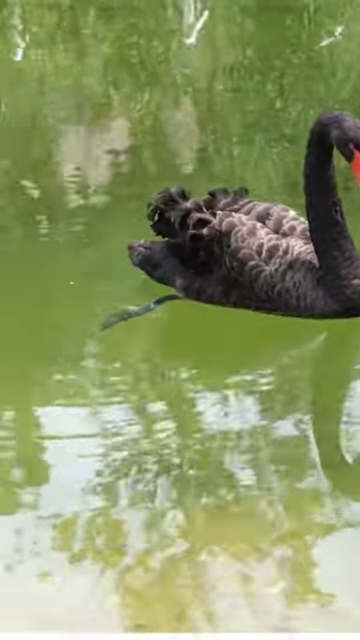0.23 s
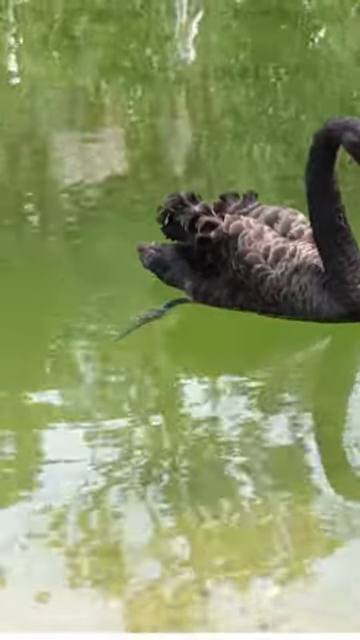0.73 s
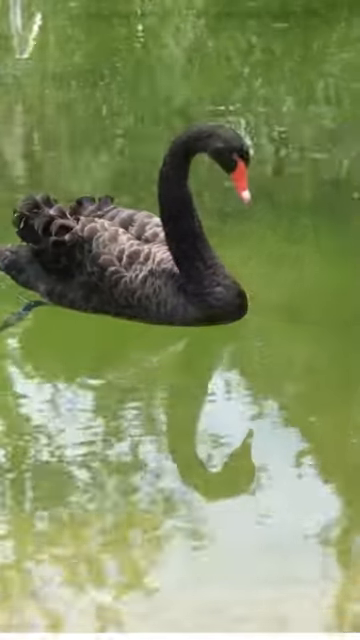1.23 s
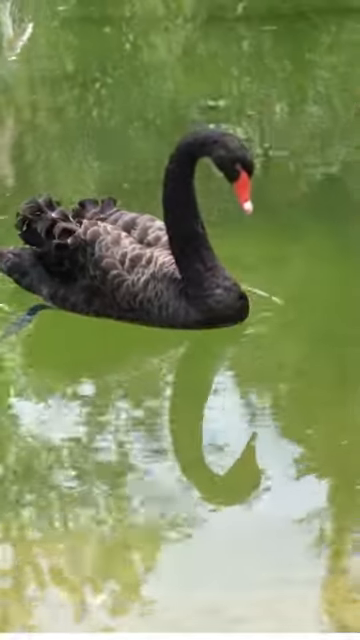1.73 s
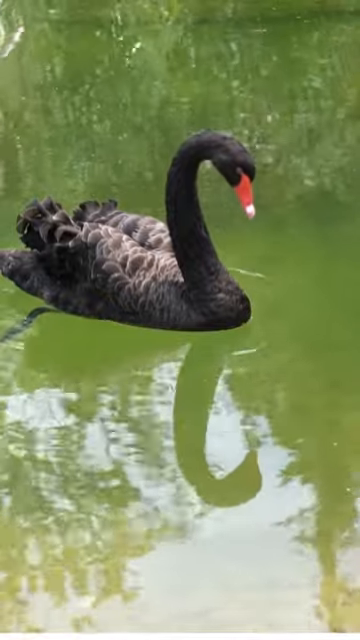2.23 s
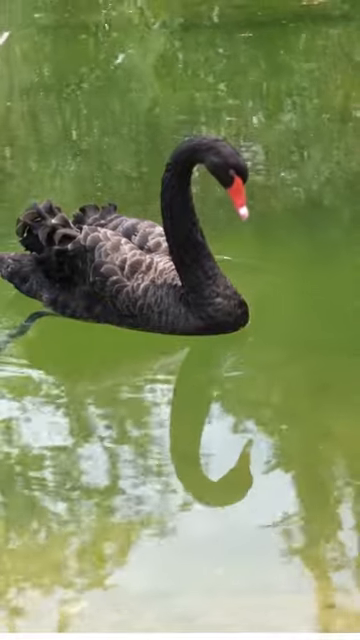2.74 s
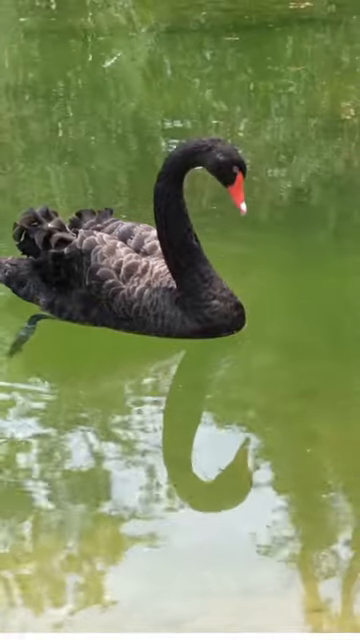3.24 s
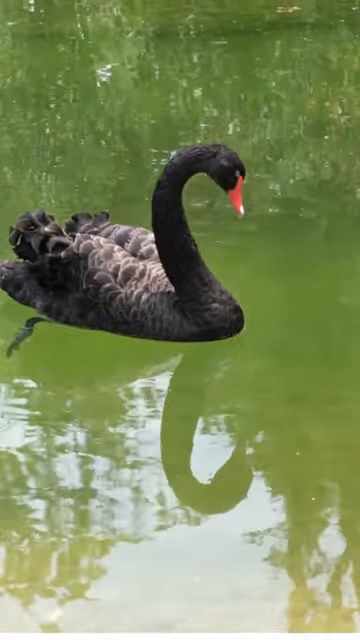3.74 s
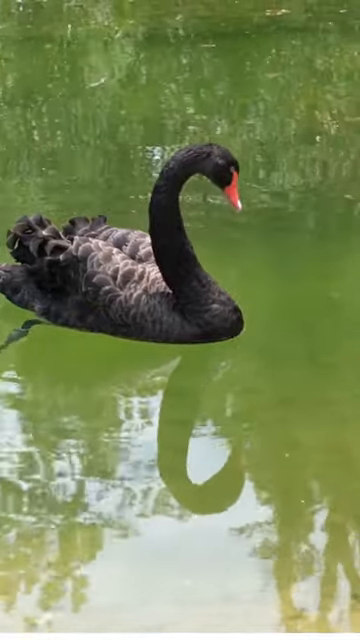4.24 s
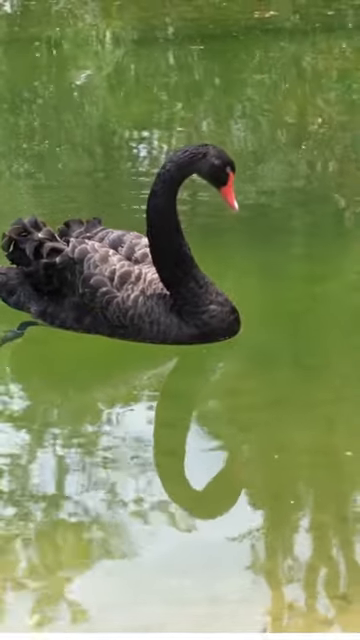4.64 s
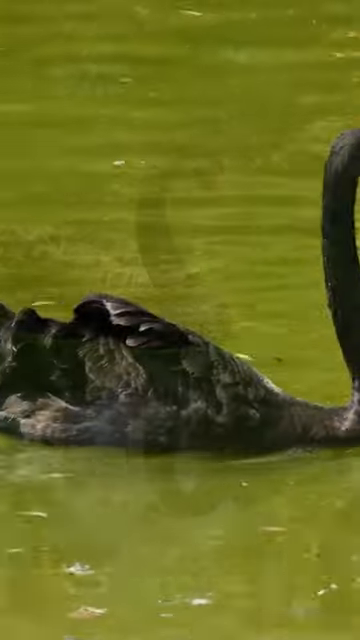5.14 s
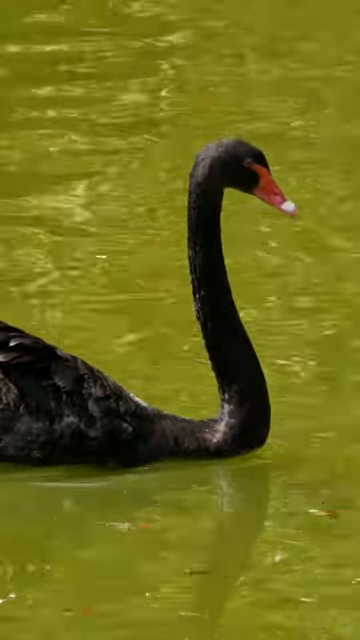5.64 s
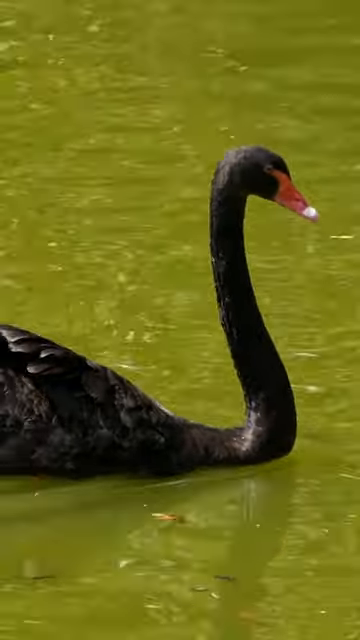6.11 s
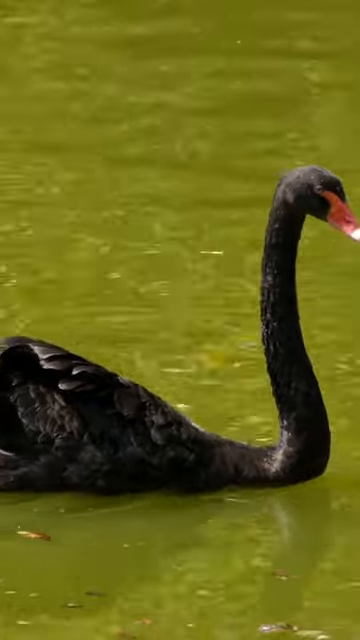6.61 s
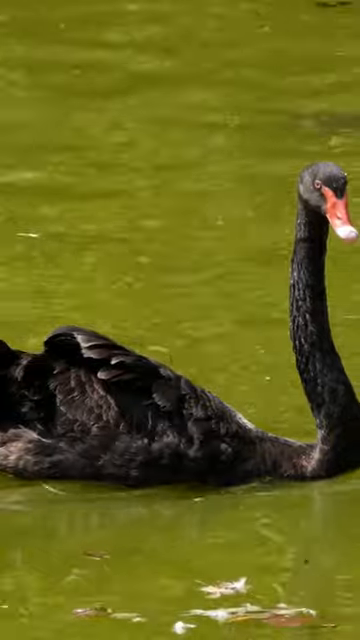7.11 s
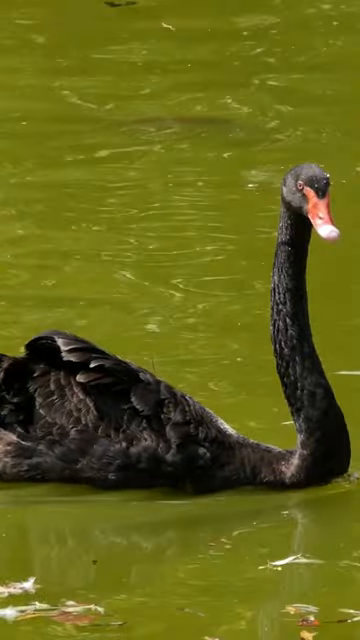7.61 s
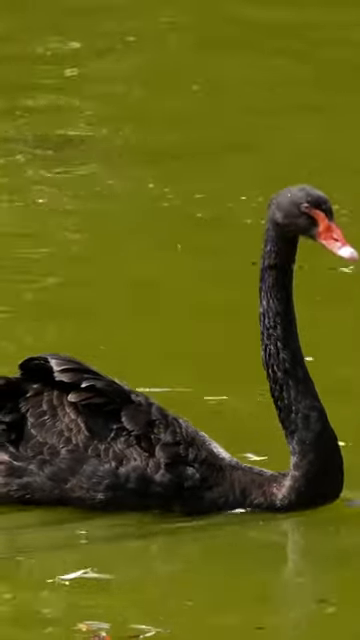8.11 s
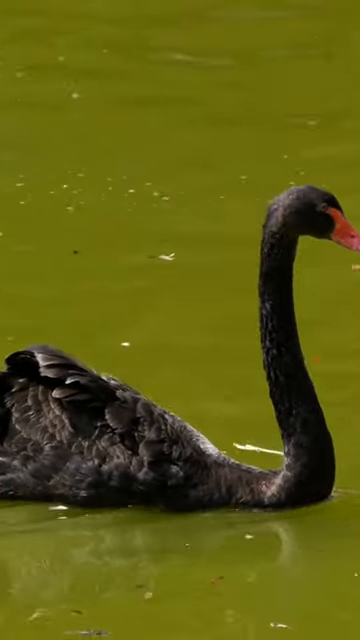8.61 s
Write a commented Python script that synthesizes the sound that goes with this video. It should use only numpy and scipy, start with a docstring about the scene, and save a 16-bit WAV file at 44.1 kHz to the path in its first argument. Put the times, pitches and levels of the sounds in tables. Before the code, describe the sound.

Three short, reedy swan bugles ring out close by over calm water, with two muffled grunts before the last and tiny drips around.

```python
"""A black swan bugles three times on a quiet lake, with two soft grunts between the second and third.
Each bugle is a stack of partials: a fast flutter that overloads the microphone chops it, then it clears
into a falling whistle and breaks to a short lower note. The grunts are softer flutters in a shut bill.
Small drips (splash and ringing bubble), grainy swishes, a soft low bump and two faint gliding bird calls
lie over a wash of shaped noise; a noise tail carries the swan's echo from the banks."""
import sys
import numpy as np
from scipy import signal
from scipy.fft import rfft, irfft
from scipy.io import wavfile
from scipy.ndimage import uniform_filter1d

SR = 44100
rng = np.random.default_rng(int(sys.argv[2]) if len(sys.argv) > 2 else 0)


def master_out(mix):
    """Clip the mix to full scale and print it as 16-bit PCM to the path in sys.argv[1]."""
    frames = np.transpose(np.atleast_2d(mix))
    ceiling = np.clip(frames, -1, 1)
    pcm = np.round(ceiling * 32767).astype(np.int16)
    wavfile.write(sys.argv[1], SR, pcm)


N = 390726  # length in samples

# pitch of a bugle: a settled whistle, a yelp at the onset, and a sag before the break
WHISTLE_HZ, YELP_HZ, YELP_S, SAG_HZ, SAG_S = 1162.9, 104, 0.012, 126, 0.12
# the whistle settles slowly; the pitch droops early in the flutter
SETTLE_HZ_PER_S, DROOP_HZ, DROOP_AT_S, DROOP_WIDTH_S = 58, 43, 0.021, 0.012
# roughness (0-1) sets in just after the tone, swells early in the flutter and clears quickly
ROUGH_ENDS, ROUGH_TOP, ROUGH_PEAK_S, ROUGH_WIDTH_S = 0.64, 0.93, 0.035, 0.022
FLUTTER_IN_S, CLEAR_S = 0.017, 0.008
# loudness: the fundamental speaks first and stops last
PREROLL_S, ATTACK_S, ATTACK_DB = 0.012, 0.02, 40.5
RELEASE_S, RELEASE_DB, FUNDAMENTAL_SHARE = 0.036, 62.5, 0.12
# the whistle dips once, swells again by a share of the dip, and fades slowly
DIP_AT_S, DIP_WIDTH_S, FADE_DB_PER_S = 0.143, 0.018, 16.5
SWELL_AT_S, SWELL_WIDTH_S, SWELL_SHARE = 0.21, 0.031, 0.45
EASE_S, SHIMMER_DB = 0.022, 1.26  # easing out of the flutter; independent shimmer of each partial
# closing note: pitch at the break and its fall, time to its peak, length, drop at the start and the end
CLOSING_HZ, CLOSING_FALL_HZ, CLOSING_PEAK_S, CLOSING_S = 951.7, 99, 0.031, 0.087
CLOSING_IN_DB, CLOSING_OUT_DB = 13.5, 34
# grunts: time to the peak, length, and the extra pitch at the start with its decay time
GRUNT_PEAK_S, GRUNT_S, GRUNT_DROP_HZ, GRUNT_DROP_S = 0.04, 0.17, 194, 0.033


def gain_of(db):
    """Decibels to amplitude."""
    return 10 ** (np.asarray(db) / 20)


def evened(x):
    """Scales to rms 1."""
    return x / np.sqrt(np.mean(x ** 2) + 1e-20)


def read(points, hz):
    """Reads a curve over frequency on a log-frequency axis."""
    f, value = np.transpose(points)
    return np.interp(np.log(hz + 1), np.log(f + 1), value)


def add(mix, s, sound):
    """Mixes a sound in at time s."""
    part = mix[max(round(s * SR), 0):][:len(sound)]
    part += sound[:len(part)]


def wander(t, hz):
    """Smooth random curve, cut from one second of low-passed noise of rms 1."""
    f = np.fft.rfftfreq(SR, 1 / SR)
    spectrum = rfft(rng.standard_normal(SR)) * np.exp(-(f / hz) ** 2)
    return evened(irfft(spectrum, SR))[:len(t)]


def bandpassed(x, low_hz, high_hz):
    """Keeps one band of a sound."""
    return signal.sosfilt(signal.butter(2, [low_hz, high_hz], "band", fs=SR, output="sos"), x)


def angle_of(hz):
    """Running phase of a frequency curve."""
    return 2 * np.pi * np.cumsum(hz) / SR


def faded(x, size=350):
    """Softens both ends of a sound over size samples."""
    edge = np.arange(len(x))
    return x * np.sin(np.pi / 2 * np.minimum(np.minimum(edge, edge[::-1]) / size, 1)) ** 2


def hump(x, centre, width):
    """A bell of height 1."""
    return np.exp(-((x - centre) / width) ** 2)


def swell(u, sharpness):
    """Level in dB of a quick rise and a slower fall, 0 dB at u = 1."""
    return sharpness * 20 * np.log10(u * np.exp(1 - u) + 1e-9)


def pushed(age, flutter_s, ease_s):
    """1 while the bird pushes hard, easing to 0 as the flutter ends."""
    return (1 - np.tanh((age - flutter_s) / (2 * ease_s))) / 2


def bugle(flutter_s, break_s, lift_hz, flare_db, dip_db, flutter_tone, whistle_tone,
          glide_s=0.0081, relax_s=0.006, late_db=30):
    """The gesture of every bugle: time, pitch, roughness and the levels of its five main partials."""
    # Peaks and notches of the open throat, which the falling partials slide through.
    # Each row: centre in Hz, width in Hz, gain in dB.
    throat = [(2200, 150, -5), (3290, 140, 1), (4650, 90, 1), (4560, 45, -12), (4740, 50, -9),
              (5603, 100, 14.5)]
    # Partials that flare as the flutter clears.
    # Each row: partial number, time from the flutter's end in seconds, width in seconds.
    flares = [(3, -0.0094, .012), (2, 0.018, 0.012)]
    # Share of the whistle's dip taken by partials 1 to 5 [ratio].
    dip_shares = (1, 0.35, 0.82, .05, 0.41)
    age = np.arange(-PREROLL_S, break_s, 1 / SR)
    to_break = age - break_s

    hz = WHISTLE_HZ + lift_hz * pushed(age, flutter_s, glide_s)
    hz += YELP_HZ * hump(np.maximum(age, 0), 0, YELP_S)
    hz -= SETTLE_HZ_PER_S * (age - DIP_AT_S)
    hz -= SAG_HZ * np.maximum(1 + to_break / SAG_S, 0) ** 2
    hz -= DROOP_HZ * hump(age, DROOP_AT_S, DROOP_WIDTH_S)

    rough = ROUGH_ENDS + (ROUGH_TOP - ROUGH_ENDS) * hump(age, ROUGH_PEAK_S, ROUGH_WIDTH_S)
    rough *= np.minimum(np.maximum(age + PREROLL_S / 2, 0) / FLUTTER_IN_S, 1)
    rough = np.clip(rough * pushed(age, flutter_s, CLEAR_S), 0, 1)

    effort = pushed(age, flutter_s - relax_s, EASE_S)
    starting = np.maximum(1 - (age + PREROLL_S) / ATTACK_S, 0)
    release_db = RELEASE_DB * np.maximum(1 + to_break / RELEASE_S, 0) ** 2
    dip = hump(age, DIP_AT_S, DIP_WIDTH_S) - SWELL_SHARE * hump(age, SWELL_AT_S, SWELL_WIDTH_S)
    fade_db = FADE_DB_PER_S * (age - DIP_AT_S)
    levels_db = []
    for k, (rough_db, clear_db, dip_share) in enumerate(zip(flutter_tone, whistle_tone, dip_shares), 1):
        whistle_db = clear_db - dip_share * dip_db * dip - fade_db
        whistle_db += sum(peak_db * hump(k * hz, centre, width) for centre, width, peak_db in throat)
        db = effort * rough_db + (1 - effort) * whistle_db + SHIMMER_DB * wander(age, 25)
        for partial, delay, width in flares:
            if round(partial) == k:
                db += flare_db * hump(age, flutter_s + delay, width)
        db -= starting * (ATTACK_DB + late_db * np.log(k))  # upper partials speak later
        db -= release_db * (1 if k > 1 else FUNDAMENTAL_SHARE)
        levels_db.append(db)
    return age, hz, rough, levels_db


def flutter(t, rough, calm_hz=132, slowing_hz=28, lead=0.1):
    """The beat of the syrinx: how far it is open, and where it is in its swing."""
    # deeper flutter is slower
    beat = lead + angle_of((calm_hz - slowing_hz * rough) * (1 + 0.059 * wander(t, 80)))
    # at full push each beat splits unevenly in two
    chaos = np.clip((rough - 0.68) / 0.3, 0, 0.85)
    flap = (1 - chaos) * np.cos(beat) + chaos * np.cos(2 * beat + 0.6 * wander(t, 130))
    opening = np.maximum(1 + np.minimum(1.45 * rough, 1) * flap, 0)
    return opening, (np.cos(beat - 0.3) + flap) / 2


def windpipe(partial, rough, trip_s=0.0013, reflection=0.064):
    """The swinging partial meets its own reflection in the long windpipe, then is evened to rms 1."""
    at = np.arange(len(partial))
    partial = partial + reflection * rough * np.interp(at - trip_s * SR, at, partial)
    return partial / np.sqrt(uniform_filter1d(partial ** 2, size=700) + 1e-9)


def call(start, t, hz, rough, main_db, dulling_db_per_s=100, puff_db=-36, swing_hz=90, jitter_hz=40,
         spread=0.45, scatter=0.45, skew=0.59, push_db=-1.5, blare_db=18, rasp_db=-31):
    """The syrinx sings a stack of partials; when pushed it flutters, chopping the tone and swinging its pitch."""
    # Colour of the overtones above the fifth, relative to a brightness set by the third.
    # Each row: frequency in Hz, level in dB.
    treble = [(6200, -53.5), (6900, -52.5), (7900, -38.5), (8400, -48.5), (9500, -64.5)]
    opening, swing = flutter(t, rough, lead=4.2)
    crest_hz = hz + swing_hz * rough
    jitter = jitter_hz * rough ** 2 * wander(t, 300) + 0.31 * wander(t, 40)
    phase = angle_of(hz + swing_hz * rough * swing + jitter)
    # effort brings out the top overtones, and the clear whistle dulls with time
    bright_db = main_db[2] + 0.7 * (main_db[2] + 26.0) + blare_db * rough
    bright_db = bright_db - dulling_db_per_s * (t - DIP_AT_S) * (1 - rough)
    levels_db = main_db + [bright_db + read(treble, k * crest_hz) for k in range(6, 9)]
    voice = np.zeros(len(t))
    for k, db in enumerate(levels_db, 1):
        # high partials sound nearer the crest of each beat, and drift out of step
        chop = opening ** (0.3 + 0.14 * k) * gain_of(2 * rough ** 2 * wander(t, 200))
        drift = 0.19 * k * rough ** 2 * wander(t, 220)
        offset = (spread + scatter * rough) * k ** 2 + skew + drift
        voice += gain_of(db) * windpipe(chop * np.cos(k * phase + offset), rough)
    rasp = gain_of(rasp_db) * rough * abs(voice) * rng.standard_normal(len(t))
    air = evened(bandpassed(rng.standard_normal(len(t)), 300, 560))
    loudness = np.sqrt(uniform_filter1d(voice ** 2, size=200) + 1e-12)
    puffs = gain_of(puff_db) * rough ** 2 * loudness * air
    return start + t[0], gain_of(push_db * rough) * faded(voice + rasp + puffs)


def closing(start, level_db, tilt_db, overlap_s=0.0045, brightening=0.2, spread=0.93):
    """The voice breaks to a clean lower note, a stack of partials which dulls as it fades."""
    # Colour of the note before its tilt. Each row: partial number, level in dB.
    closing_tone = [(1, 5), (2, -1.5), (3, -6), (4, 5), (5, -5), (6, -6), (7, -44.5)]
    t = np.arange(0, CLOSING_S, 1 / SR)
    hz = CLOSING_HZ - CLOSING_FALL_HZ * (t / CLOSING_S) ** 1.68
    rising = np.maximum(1 - t / CLOSING_PEAK_S, 0)
    falling = np.maximum(t - CLOSING_PEAK_S, 0) / (CLOSING_S - CLOSING_PEAK_S)
    db = level_db - CLOSING_IN_DB * rising ** 2 - CLOSING_OUT_DB * falling ** 2.62
    phase = angle_of(hz + 1.1 * wander(t, 90))
    slope_db = tilt_db + brightening * (db - db.max())
    sizes = [gain_of(tone_db + (k - 1) * slope_db) for k, tone_db in closing_tone]
    voice = sum(size * np.cos(k * phase + spread * k ** 2) for k, size in enumerate(sizes, 1))
    voice = voice * np.sqrt(2 / np.sum(np.square(sizes), 0))  # rms 1 whatever the colour
    return start - overlap_s, faded(gain_of(db) * voice)


def grunt(start, flutter_s, pitch_hz, level_db, roughness, sharpness, fading=0.1, swing_hz=170,
          jitter_hz=50, tilt_db=-2, dulling=0.022, air=0.06, leak_db=-25):
    """The same flutter, softly, through the fixed resonances of a shut bill; duller as it falls and fades."""
    # Resonances of the shut bill. Each row: centre in Hz, width of each of two passes in Hz, gain in dB.
    shut_throat = [(1170, 910, 3.5), (2910, 440, -7.5), (4196, 360, 11)]
    t = np.arange(0, GRUNT_S, 1 / SR)
    hz = pitch_hz + GRUNT_DROP_HZ * np.exp(-t / GRUNT_DROP_S)
    db = level_db + swell(t / GRUNT_PEAK_S, sharpness)
    rough = np.clip(roughness * pushed(t, flutter_s, EASE_S), 0, 1)
    opening, swing = flutter(t, rough, lead=2.73)
    phase = angle_of(hz + rough * (swing_hz * (swing - 0.5) + jitter_hz * wander(t, 450)))
    slope_db = tilt_db + dulling * (hz - 1402) + fading * np.maximum(db - level_db, -20)
    sizes = [gain_of(slope_db * k) for k in range(5)]
    source = sum(size * np.cos(k * phase) for k, size in enumerate(sizes, 1))
    source = source / np.sqrt(np.sum(np.square(sizes), 0))
    source = opening ** 0.63 * (source + air * rough * rng.standard_normal(len(t)))
    voice = gain_of(leak_db) * source
    for centre, width, peak_db in shut_throat:
        b, a = signal.iirpeak(centre, centre / width, fs=SR)
        voice += gain_of(peak_db) * signal.lfilter(b, a, signal.lfilter(b, a, source))
    loudness = np.sqrt(abs(uniform_filter1d(voice ** 2, size=800)) + 1e-12)
    return start, faded(gain_of(db) * voice / loudness)


def drip(db, hz, ring_t60=0.008, splash_t60=0.005, splash=0.8):
    """A drop splashes and leaves a tiny ringing bubble: a noise burst and a decaying sine."""
    t = np.arange(SR // 25) / SR
    band = np.clip([0.75 * hz, 1.4 * hz], 2000, 15000)
    spray = evened(bandpassed(rng.standard_normal(len(t)), *band))
    ring = gain_of(-60 * t / ring_t60) * np.sin(2 * np.pi * hz * t)
    sound = ring + splash * gain_of(-60 * t / splash_t60) * spray
    sound *= 1 - np.exp(-t / 0.00014)
    return gain_of(db) * sound / abs(sound).max()


def water(far_db=-71, spread_db=12, cluster_s=0.09, count=40, size=6):
    """Near drips, and little clusters of smaller ones scattered over the lake."""
    # Near drips. Each row: start in seconds, peak level in dB, ring of the bubble in Hz.
    near_drips = [(0.6764, -54.5, 6830), (0.8456, -54, 7680), (1.0146, -55.5, 5760), (1.0864, -61, 5910),
                  (1.1467, -56, 5230), (1.1767, -57, 5890), (1.5676, -57, 5560), (1.9942, -49, 7140),
                  (2.0812, -55, 4200), (2.1194, -55, 4960), (2.2113, -51.5, 3690), (3.3023, -52.5, 5600),
                  (3.577, -54, 6530), (3.6152, -57.5, 3860), (3.8635, -53, 3670), (3.927, -48.5, 10600),
                  (4.2087, -55, 6800), (4.4494, -52, 7800), (5.1963, -51, 7450), (5.23, -41.5, 7500),
                  (7.5611, -48.5, 4100), (8.4811, -52.5, 5370), (8.5959, -46, 5130)]
    out = np.zeros(N)
    for s, db, hz in near_drips:
        add(out, s, drip(db, hz))
    for centre in rng.random(count) * N / SR:
        for when, strength, pitch in rng.random((size, 3)):
            small_drip = drip(far_db + spread_db * strength ** 3, 4500 + 6500 * pitch)
            add(out, centre + cluster_s * (2 * when - 1), small_drip)
    return out


def swish(s, length, hz, db):
    """A brief grainy hiss of moving water: sparse random grains in a narrow band."""
    n = round(length * SR)
    grains = rng.standard_normal(n) * (rng.random(n) < 0.03)
    hiss = bandpassed(grains, 0.8 * hz, 1.1 * hz)
    return s - length / 2, gain_of(db) * evened(hiss * np.hanning(n))


def bump(s, db=-54, hz=150, length=0.01):
    """A soft low bump: a few cycles of a low tone under a bell."""
    t = np.arange(-SR // 20, SR // 20) / SR
    return s + t[0], gain_of(db) * hump(t, 0, length) * np.cos(2 * np.pi * hz * t)


def far_call(start, length, first_hz, middle_hz, last_hz, level_db, waver_hz=18, peak_share=0.31):
    """A faint bird's gliding tone, blurred by distance: a sine with a wavering pitch."""
    u = np.arange(0, length, 1 / SR) / length
    hz = np.polyval(np.polyfit([0, 0.5, 1], [first_hz, middle_hz, last_hz], 2), u)
    db = level_db + swell(u / peak_share, sharpness=1.8)
    tone = np.sqrt(2) * np.sin(angle_of(hz + waver_hz * wander(u, 120)))
    return start, faded(gain_of(db) * tone)


def banks(x):
    """A diffuse tail from the banks: noise whose bands each die at their own speed."""
    # Ring of the banks. Each row: frequency in Hz, time to fall by 60 dB in seconds.
    bank_ring = [(300, .35), (1300, 0.29), (4000, 0.19), (12000, 0.14)]
    hz, t, z = signal.stft(rng.standard_normal(SR), SR, nperseg=256)
    decay = gain_of(-60 * t / read(bank_ring, hz)[:, None])
    tail = signal.istft(z * decay, SR, nperseg=256)[1]
    return signal.fftconvolve(x, tail / np.linalg.norm(tail))[:N]


def wash():
    """Distant outdoor noise: a fixed spectrum whose level shifts slowly."""
    # Colour of the wash. Each row: frequency in Hz, relative level in dB per Hz.
    wash_colour = [(18, -65), (30, -35.5), (98, 0.5), (174, 0.5), (203, -4), (238, 0), (271, -4),
                   (353, -0.5), (523, -7), (1030, -7.5), (1310, -12), (2100, -9), (4730, -26.5),
                   (10700, -33), (15800, -42)]
    # Loudness of the wash over time. Each row: time in seconds, rms level in dB.
    wash_level = [(0, -66), (1.5, -65.5), (2.8, -64.5), (6.999, -64.5), (8.86, -61.5)]
    colour = gain_of(read(wash_colour, np.fft.rfftfreq(N, 1 / SR)))
    noise = irfft(rfft(rng.standard_normal(N)) * colour, N)
    level_db = np.interp(np.arange(N) / SR, *np.transpose(wash_level))
    return gain_of(level_db) * evened(noise)


def scene(wet_db=-52):
    """The swan close by on open water, with drips, distant birds and the wash around it."""
    # Each row: start in seconds, flutter length in seconds, time until the voice breaks in seconds,
    # lift of the flutter in Hz, flare in dB, depth of the dip in dB, closing note's level in dB,
    # its tilt in dB per partial.
    bugles = [(2.265, 0.081, 0.31, 89.6, 6, 2, -29.5, -0.2), (5.277, 0.1, 0.31, 114.8, 0.5, 4, -30.5, -1.1),
              (8.014, .086, 0.3025, 107.3, 6.5, 5.5, -29.5, 0.5)]
    # Colour of each bugle's flutter. Each row: levels of partials 1 to 5 in dB.
    flutter_tones = [(-19, -22.5, -21, -26, -50.5), (-18.5, -22, -20.5, -30, -51),
                     (-18.5, -19.5, -18.5, -28.5, -41)]
    # Colour of each bugle's whistle, before throat, dip and fade. Each row: partials 1 to 5 in dB.
    whistle_tones = [(-29, -26, -25, -30.5, -49.5), (-26, -23.5, -26.5, -33.5, -53.5),
                     (-27.5, -20.5, -21.5, -37.5, -44)]
    # Each row: start in seconds, flutter length in seconds, pitch it falls towards in Hz, peak level in dB,
    # roughness from 0 to 1, sharpness of the swell [exponent].
    grunts = [(6.245, 0.18, 1364, -38, .8, 3.9), (6.353, 0.073, 1182, -45, 0.6, 2.8)]
    # Distant birds. Each row: start in seconds, length in seconds, pitch at the start in Hz, at the middle
    # in Hz, at the end in Hz, level at the peak in dB.
    far_calls = [(2.883, .5, 1178, 1283, 1250, -72), (4.893, 0.052, 770, 1036, 1850, -58.5)]
    # Swishes of water. Each row: middle in seconds, length in seconds, centre of the band in Hz, rms in dB.
    swishes = [(0.862, 0.086, 7600, -77), (3.455, 0.091, 4670, -79), (7.244, 0.29, 5460, -86)]
    swan = np.zeros(N)
    for row, *tones in zip(bugles, flutter_tones, whistle_tones):
        start, flutter_s, break_s, *shape, closing_db, tilt_db = row
        add(swan, *call(start, *bugle(flutter_s, break_s, *shape, *tones)))
        add(swan, *closing(start + break_s, closing_db, tilt_db))
    for row in grunts:
        add(swan, *grunt(*row))
    lake = swan + gain_of(wet_db) * banks(swan) + wash() + water()
    for row in far_calls:
        add(lake, *far_call(*row))
    for row in swishes:
        add(lake, *swish(*row))
    add(lake, *bump(1.85))
    return lake[None]


def record(dry, ceiling=0.31, edge_hz=15900):
    """The microphone input clips the loudest peaks, at twice the rate; then a low-pass limits the band."""
    fine = signal.resample_poly(dry, 2, 1, axis=1)
    clipped = signal.resample_poly(np.clip(fine, -ceiling, ceiling), 1, 2, axis=1)
    low_pass = signal.firwin(511, edge_hz, window=("kaiser", 9), fs=SR)
    return signal.oaconvolve(clipped, low_pass[None], "same")


dry = scene()
out = record(dry)
master_out(out)
```